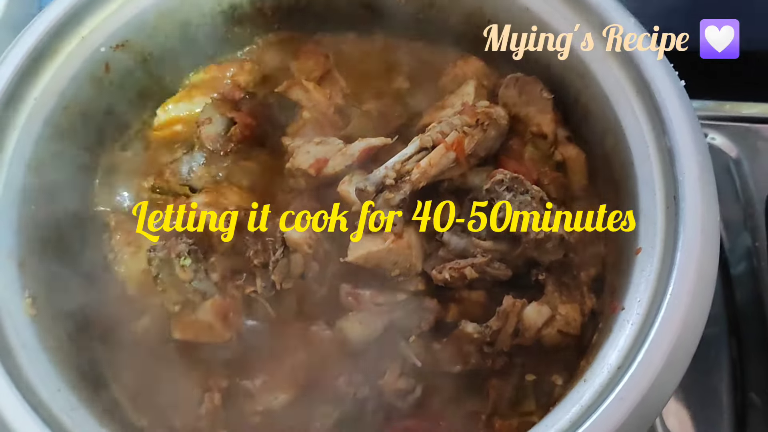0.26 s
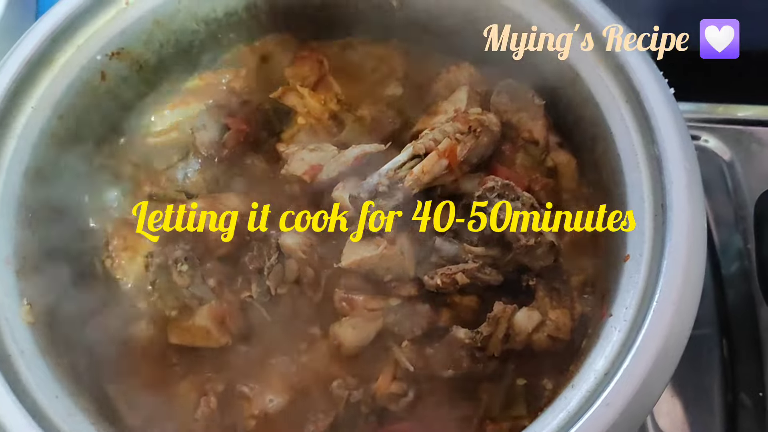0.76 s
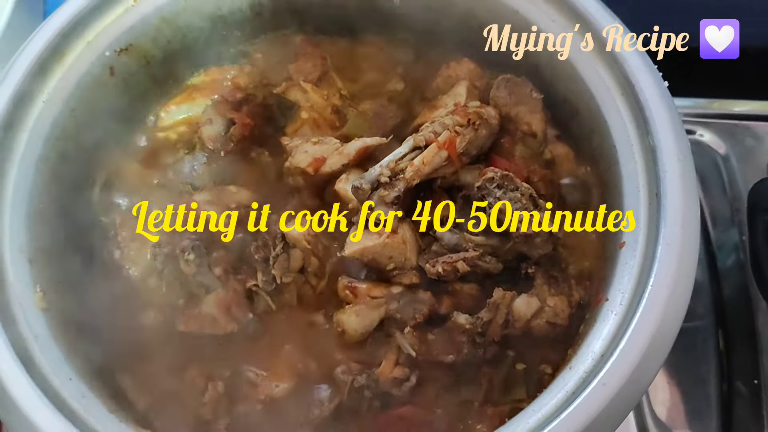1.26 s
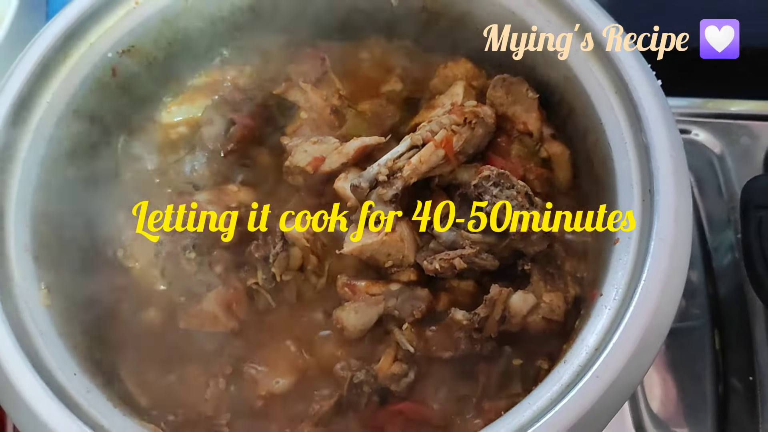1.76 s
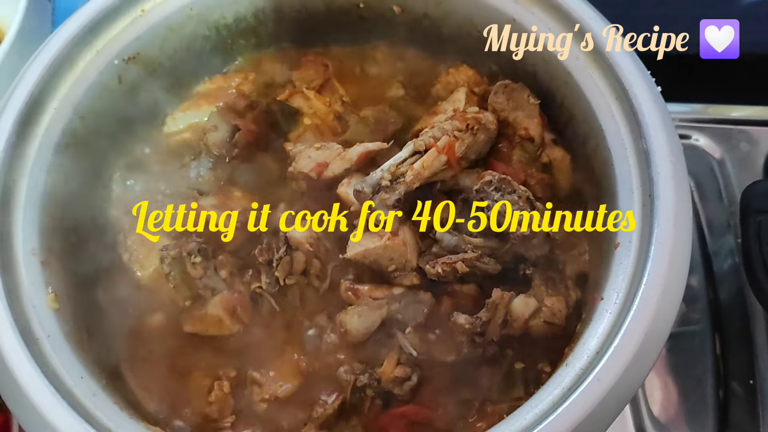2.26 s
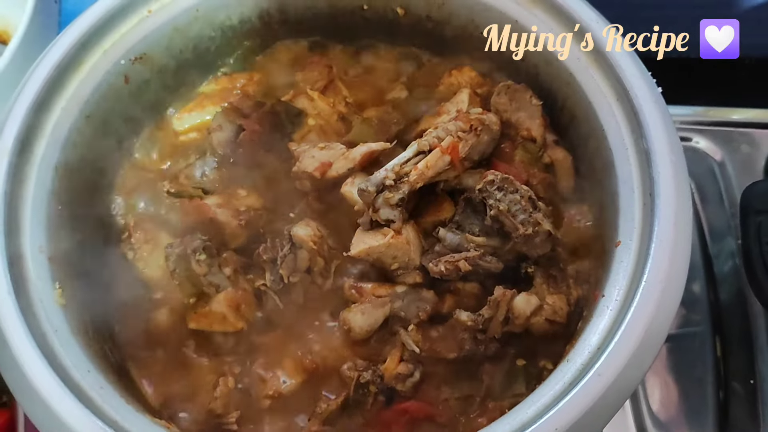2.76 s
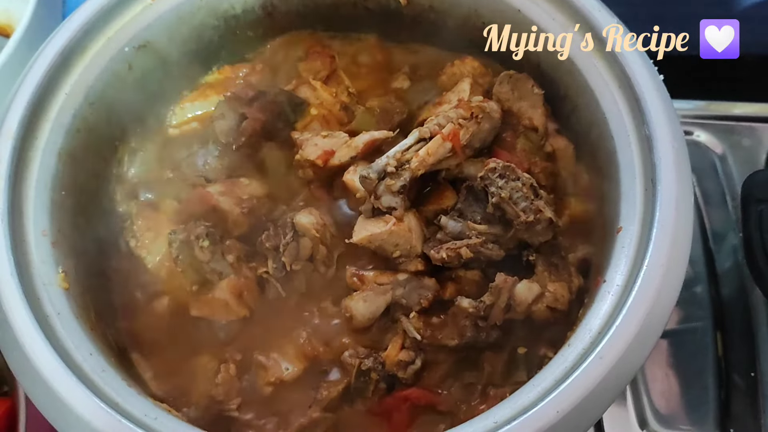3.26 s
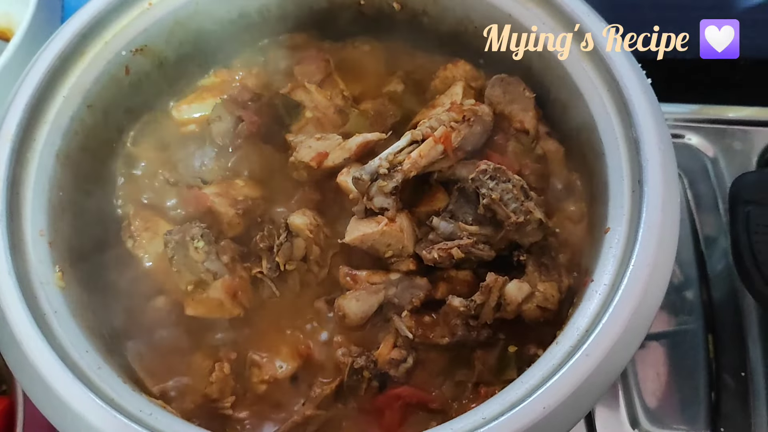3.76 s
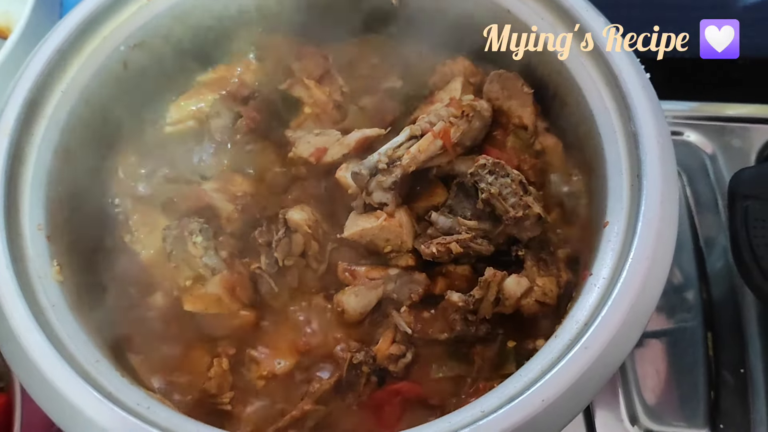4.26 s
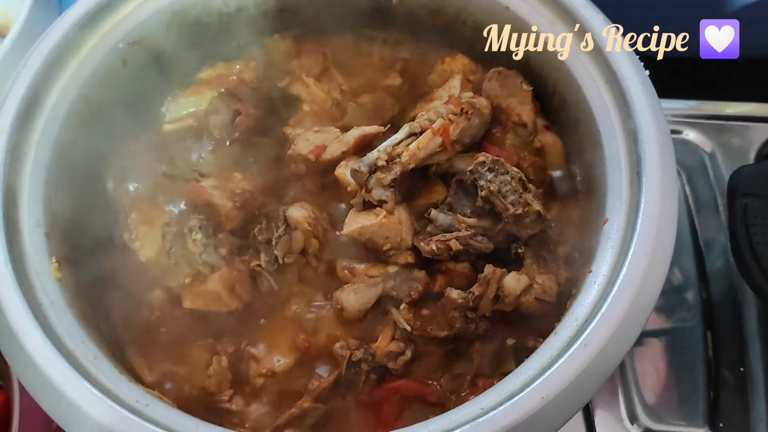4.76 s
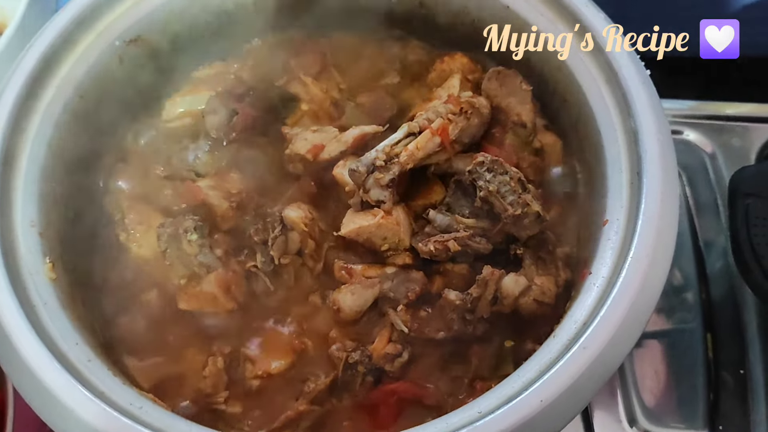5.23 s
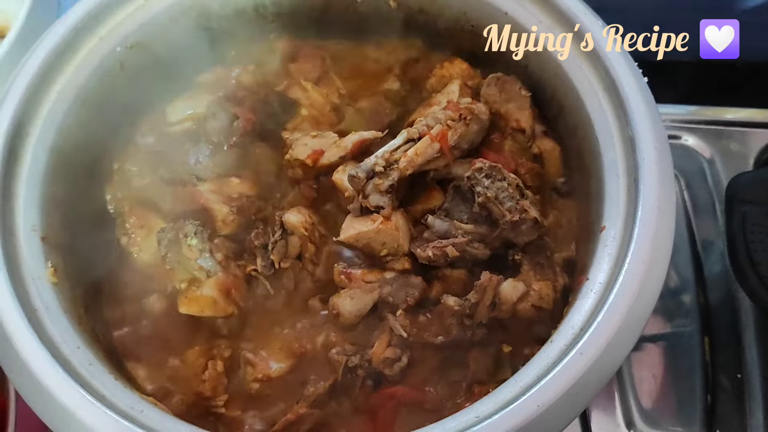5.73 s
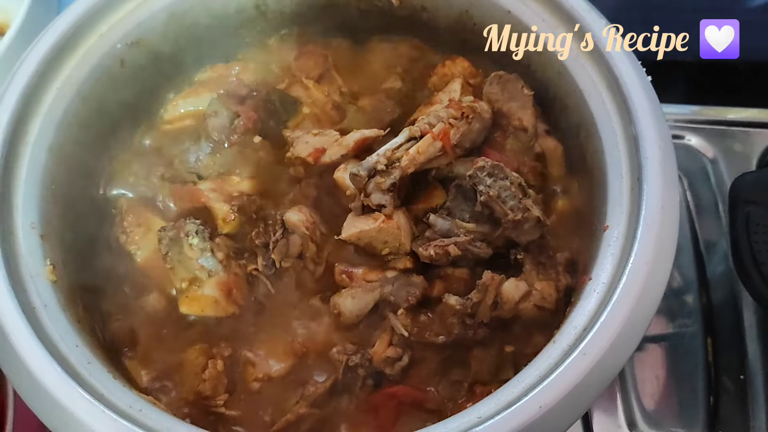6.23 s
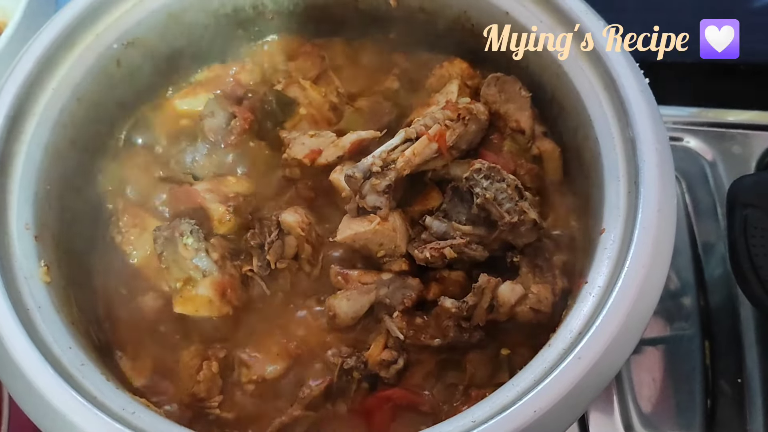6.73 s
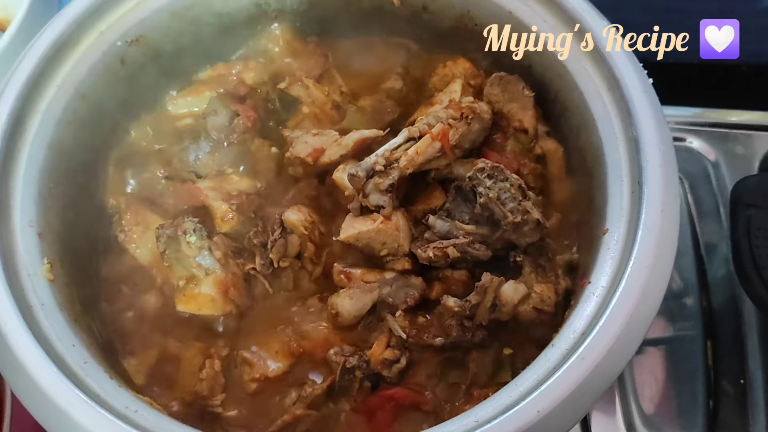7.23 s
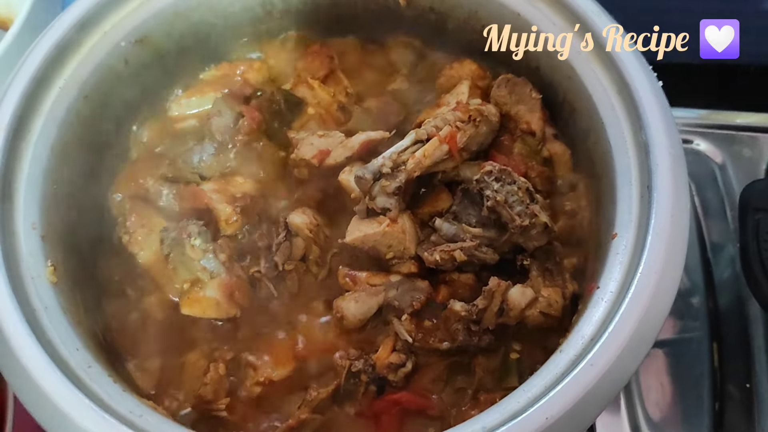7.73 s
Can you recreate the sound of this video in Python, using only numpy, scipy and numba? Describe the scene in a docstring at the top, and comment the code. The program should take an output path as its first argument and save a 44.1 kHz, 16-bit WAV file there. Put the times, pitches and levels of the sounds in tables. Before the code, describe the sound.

Thick sauce boils hard in a metal pot, dull plopping bubbles and thin ticks over soft burner roar, hiss and low steam thumps.

```python
"""Thick sauce boils hard in a metal pot; a phone with two microphone ports is held in the steam above it.
From the start the burner roars softly and gas and steam hiss (shaped noise), puffs of steam thump on the ports
(slow pressure swings), and bubbles burst with dull pops and thin ticks (short decaying rings), echoed by pot and stove.
A bright rush of steam swells from 1.9 to 3.4 s; fat spits (fading noise) near 2.8, 3.8 and 5.1 s.
From 5.62 s to the end an earlier stretch, taken from 2.98 s on, is laid on top."""
import sys
import numpy as np
from scipy import signal
from scipy.fft import rfft, irfft
from scipy.io import wavfile
from scipy.ndimage import uniform_filter1d
from numba import njit

SR = 44100
rng = np.random.default_rng(int(sys.argv[2]) if len(sys.argv) > 2 else 0)


def volts_from_db(level):
    """Convert decibel levels to linear amplitude ratios."""
    exponent = np.asarray(level, float) / 20
    return 10 ** exponent


def unload_audio(sound):
    """Save the sound as a 16-bit wav file, at the path given as the first command line argument."""
    columns = np.transpose(np.atleast_2d(sound))
    # keep every value between -1 and 1, then stretch to whole-number steps
    steps = np.round(np.clip(columns, -1, 1) * 32767)
    wavfile.write(sys.argv[1], SR, steps.astype(np.int16))


N = 352359
T = np.arange(N) / SR


def colour(x, table, db):
    """Shapes the spectrum of noise by a table of (pitch_hz, relative level_db) and sets its rms level."""
    hz, gain_db = np.transpose(table)
    f = np.arange(N // 2 + 1) * SR / N + 1  # 1 Hz up, to keep the logarithm finite
    gain = volts_from_db(np.interp(np.log(f), np.log(hz), gain_db, left=-60, right=-60))
    y = irfft(rfft(x) * gain, N)
    return y * volts_from_db(db) / np.sqrt(np.mean(y ** 2))


def walk(rate):
    """Random levels held 1 / rate s and slewed twice; spread near 1."""
    k = int(SR / rate)
    held = np.repeat(rng.standard_normal(N // k + 1), k)
    return 1.88 * uniform_filter1d(uniform_filter1d(held, k), k)[:N]


def stereo_noise(table, db, side_db):
    """Noise with a shared part and a part of opposite sign in the two ports."""
    mid, side = (colour(rng.standard_normal(N), table, db) for _ in range(2))
    return mid + volts_from_db(side_db) * side * np.array([[1], [-1]])


def burner_roar(bunch):
    """Low flame noise whose level wavers and rises and falls with the bunches of bursts."""
    # spectrum of the burner: pitch_hz, relative level_db
    roar_colour = [(55, 3.5), (100, -4), (160, 0.5), (240, -10.5), (290, 0.5), (400, -10.5), (690, -7),
                   (1400, -12.5), (4000, -32), (7000, -52)]
    waver_db = 0.17 * walk(9.8) + 4.83 * np.tanh(bunch)
    return volts_from_db(waver_db) * stereo_noise(roar_colour, -42.0, -21.0)


def gas_hiss(bunch):
    """Lasting treble noise of gas and steam that flickers in level."""
    # spectrum of the hiss: pitch_hz, relative level_db
    hiss_colour = [(1500, -73), (3000, -24), (5000, -2), (6800, 7), (9000, 1.5), (12500, -0.5),
                   (15500, -8.5)]
    flicker_db = 1.86 * walk(60) + 0.6 * bunch
    return volts_from_db(flicker_db) * stereo_noise(hiss_colour, -61.5, 0)


def steam_rush():
    """One bright rush of steam: treble noise that swells and sinks."""
    # course of the rush: time_s, level_db
    surge = [(1.9, -72), (2.3, -55.5), (2.6, -53.5), (3.08, -54), (3.13, -56), (3.4, -70.5)]
    rush = stereo_noise([(3000, 1.5), (8000, -0.5), (12500, -3.5), (15500, -10)], 0, -4.5)
    return volts_from_db(np.interp(T, *np.transpose(surge))) * rush


def steam(port):
    """Each puff sucks at the membrane, which swings back and dips once more; a slow draught wanders around."""
    # puffs on the ports: time_s (deepest suction), port, level_db (suction before the high-pass), pitch_hz
    puffs = [(0.018, "right", -2.5, 19), (0.08, "left", -3, 25), (0.105, "right", -1.5, 20.6),
             (0.196, "left", -8, 19), (0.944, "right", -8.5, 20), (1.095, "right", 3.5, 17.2),
             (1.114, "left", -2.5, 13), (1.255, "left", -9, 15), (1.732, "right", -16, 17),
             (2.567, "right", -5.5, 14), (4.277, "right", -6.5, 26), (4.304, "right", -4.5, 23),
             (4.308, "left", -17, 54), (4.333, "left", -5.5, 10), (4.99, "right", -8, 21.6),
             (5.106, "left", -10.5, 18.4), (5.345, "left", -8, 24), (5.352, "right", -12, 23),
             (5.696, "right", -2, 20), (5.718, "left", -5, 12.5), (6.045, "right", -3, 25),
             (6.109, "left", -12.5, 20), (6.38, "right", -9, 25), (6.411, "left", -5, 25),
             (7.104, "right", -7, 20), (7.346, "right", 1.5, 12.3), (7.382, "left", -4, 7.9)]
    suck_turns, swing_turns = 0.16, 0.23  # widths, in turns of the thump's pitch
    swing_back, settle = 0.59, 0.13  # rebound and last dip, relative to the suction
    stir_late_s, stir_s, stir_db = 0.034, 0.12, -21  # turbulence that trails each puff
    swing, stir = np.zeros(N), np.zeros(N)
    for s, side, db, hz in puffs:
        if side != port:
            continue
        turns = (T - s) * hz
        suction = np.exp(-(turns / suck_turns) ** 2)
        rebound = swing_back * np.exp(-((turns - .5) / swing_turns) ** 2)
        last_dip = settle * np.exp(-((turns - 1) / swing_turns) ** 2)
        swing += volts_from_db(db) * (rebound - suction - last_dip)
        stir += volts_from_db(db + stir_db) * np.exp(-((T - s - stir_late_s) / stir_s) ** 2)
    thumps = signal.sosfilt(signal.butter(2, 6., "high", fs=SR, output="sos"), swing)
    draught_colour = [(3, 21.5), (10, 28.0), (18, 21.0), (35, 10.5), (70, -3.5), (140, -39)]
    draught = colour(rng.standard_normal(N), draught_colour, 0)
    return thumps + draught * (stir + volts_from_db(-33.0 + 1.1 * walk(4.945)))


def kitchen(x, t60, db, side_db):
    """Short dull echoes off the pot and the stove, a little different in the two ports."""
    t = T[:SR // 4]
    fade = np.exp(-np.log(1000) * t / t60) * (t > .0015)
    mid, side = rng.standard_normal((2, len(t))) * fade
    tail = (mid + volts_from_db(side_db) * side * np.array([[1], [-1]])) / np.sqrt(np.sum(mid ** 2))
    dull = signal.sosfilt(signal.butter(1, 3000., fs=SR, output="sos"), tail)
    return x + volts_from_db(db) * signal.fftconvolve(x, dull, axes=1)[:, :N]


def spits():
    """Fat spits: a sharp spray of noise that starts at once, flutters and fades."""
    # fat spitting: start_s, level_db (typical, at the start), t60_s
    spit_list = [(2.779, -35, 0.057), (2.795, -36, 0.038), (3.812, -48, 0.4), (5.083, -36.5, 0.17)]
    # spectrum of the spray: pitch_hz, relative level_db
    spray_colour = [(500, -10), (2500, 10), (8000, 7), (12000, 1), (15500, -20)]
    fade = np.zeros(N)
    for s, db, t60 in spit_list:
        fade += volts_from_db(db) * (T >= s) * np.exp(-np.log(1000) * np.maximum(T - s, 0) / t60)
    return fade * volts_from_db(2.7 * walk(300)) * stereo_noise(spray_colour, 0, -6.5)


@njit
def grains(at, hz, size, cycles, rise, glide, pan, n, sr):
    """Each grain is a ring that rises, climbs in pitch by glide and dies within some cycles."""
    out = np.zeros((2, n))
    for k in range(len(at)):
        start = int(at[k] * sr)
        for i in range(min(int(6 * cycles[k] * sr / hz[k]), n - start)):
            c = i * hz[k] / sr  # cycles since the start
            envelope = (1 - np.exp(-c / rise)) ** 2 * np.exp(-c / cycles[k])
            v = size[k] * envelope * np.sin(2 * np.pi * c * (1 + glide * c))
            out[0, start + i] += v * pan[k]
            out[1, start + i] += v / pan[k]
    return out


def bursts(at, hz, db, cycles, rise, glide, pan_db):
    """Bubble bursts, each with its own ring length and place; at and db give roughly the peak."""
    chance = rng.standard_normal((len(at), 2)).T
    start = np.maximum(at - 1.461 / hz, 0)  # the ring needs a moment to reach its peak
    pan = volts_from_db(0.3 + pan_db * chance[1])  # leans slightly left
    # top of the grain's envelope at the typical ring length
    crest = (1 + 2 * cycles / rise) ** (-rise / cycles) / (1 + rise / (2 * cycles)) ** 2
    return grains(start, hz, volts_from_db(db) / crest, cycles * np.exp(.25 * chance[0]), rise, glide, pan, N, SR)


def swarm(bunch, count, hz, octaves, spread_db, bunch_db, top_db):
    """Times, pitches and relative sizes of many bursts that are louder in bunches."""
    u = rng.random((count, 2)).T
    at = u[0] * N / SR
    pitch = hz * 2 ** (octaves * rng.standard_normal(count))
    size_db = -spread_db * np.log(1 - u[1]) + bunch_db * bunch[(u[0] * N).astype(int)]
    return at, pitch, np.minimum(size_db, top_db)


def ticks(bunch):
    """Small bright bursts at the surface that also knock the pot wall into ringing, over a fine fizz."""
    # bright ticks: time_s, level_db (before the high-pass), pitch_hz
    tick_list = [(0.233, -32, 4540), (0.795, -31.5, 5330), (0.826, -28, 3930), (1.124, -31, 2340),
                 (1.385, -37, 7000), (1.473, -36, 5300), (1.981, -33, 5900), (2.062, -33, 8800),
                 (2.593, -32, 5200), (2.78, -22, 8300), (2.797, -24, 4140), (3.796, -37, 6500),
                 (3.8127, -6, 2940), (4.459, -36, 7000), (4.577, -32.5, 6450), (4.593, -19, 5290),
                 (4.945, -32.5, 5700), (5.172, -35, 6400)]
    # ringing modes of the pot wall: pitch_hz, level_db (relative to the tick, before filtering), t60_s
    wall_modes = [(1730, -22, 0.026), (1870, -36, 0.048), (5660, -1.5, 0.0039)]
    at, db, hz = np.transpose(tick_list)
    bright = bursts(at, hz, db, cycles=0.75, rise=0.4, glide=0., pan_db=0.3)

    knock = np.zeros(N)
    knock[((at - 1 / hz) * SR).astype(int)] = volts_from_db(db)
    t = T[:SR // 10]
    wall = np.zeros(len(t))
    for f, g, t60 in wall_modes:
        wall += volts_from_db(g) * np.sin(2 * np.pi * f * t) * np.exp(-np.log(1000) * t / t60)
    soft = signal.butter(4, 6800., fs=SR, output="sos")  # a wet knock is dull at the top
    clank = signal.sosfilt(soft, signal.fftconvolve(knock, wall)[:N])

    at, hz, db = swarm(bunch, count=6500, hz=6500, octaves=0.52, spread_db=4.0, bunch_db=2.0, top_db=20.5)
    fizz = bursts(at, np.minimum(hz, 15000), db - 59.5, cycles=3.2, rise=0.68, glide=0., pan_db=2.5)
    thin = signal.butter(2, 1300., "high", fs=SR, output="sos")
    return signal.sosfilt(thin, bright + fizz + clank)


def pop(at, hz, db, cycles, snap_db, thud_db):
    """The skin tears with a short high snap, the cavity rings, and the sauce slumps with a low thud."""
    scatter = rng.standard_normal((len(at), 4)).T
    snap_hz = np.clip(1.74 * hz * np.exp(0.19 * scatter[0]), 1100, 2500)
    snap = bursts(at, snap_hz, db + snap_db + 2 * scatter[1], cycles=1.0, rise=0.16, glide=0., pan_db=-1.8)
    thud_hz = 280 * np.exp(0.37 * scatter[2])
    thud = bursts(at + 0.00403, thud_hz, db + thud_db + 2.84 * scatter[3],
                  cycles=1.0, rise=0.41, glide=0., pan_db=3.0)
    ring = bursts(at, hz, db, cycles, rise=0.34, glide=0.011, pan_db=0.02)
    # the air in the pot cancels one band of the snap and the ring
    return signal.lfilter(*signal.iirnotch(470., 2.2, fs=SR), snap + ring) + thud


def bubbling(bunch):
    """Loud pops over a patter of small ones; the pot's air sings along and thick sauce damps the treble."""
    # strength of the boil: time_s, level_db (base level of the small bursts, before filtering)
    boil = [(0.0, -44), (0.5, -38), (1.5, -45), (3.0, -35.5), (3.7, -41.5), (4.3, -37), (8.0, -38)]
    # loudest bubble bursts: time_s, level_db (of the ring, before filtering), pitch_hz
    pops = [(0.019, -20.0, 940), (0.111, -17.5, 1270), (0.12, -16.5, 1450), (0.27, -21.0, 940),
            (0.334, -15.0, 860), (0.367, -18.0, 880), (0.409, -23.5, 1570), (0.638, -24.5, 940),
            (0.648, -22.5, 1430), (0.787, -22.0, 790), (0.883, -20.0, 820), (0.897, -23.5, 850),
            (0.93, -22.0, 880), (0.994, -20.5, 930), (1.063, -18.0, 1160), (1.137, -23.0, 780),
            (1.996, -20.0, 920), (2.196, -23.0, 790), (2.326, -23.5, 820), (2.345, -24.5, 900),
            (2.356, -21.0, 1340), (2.443, -23.5, 1060), (2.559, -22.5, 1120), (2.708, -23.0, 750),
            (2.762, -18.5, 1100), (2.882, -22.0, 990), (2.894, -24.5, 940), (2.955, -23.0, 1600),
            (3.014, -24.5, 740), (3.072, -22.5, 1130), (3.22, -24.5, 950), (3.232, -21.5, 1130),
            (3.467, -22.5, 650), (3.551, -16.0, 950), (3.568, -22.0, 870), (3.962, -21.5, 920),
            (3.973, -17.0, 1290), (4.074, -22.5, 750), (4.183, -23.0, 800), (4.202, -22.5, 860),
            (4.236, -18.5, 1300), (4.245, -22.0, 930), (4.313, -23.0, 950), (4.381, -21.0, 810),
            (4.425, -20.5, 1220), (4.628, -22.0, 2230), (4.718, -17.5, 1210), (4.799, -20.0, 1630),
            (5.052, -24.0, 1200), (5.232, -22.5, 1060), (5.282, -23.0, 760), (5.327, -19.0, 810),
            (5.338, -23.0, 820), (5.348, -21.5, 750), (5.575, -21.5, 820), (5.675, -18.5, 830),
            (5.887, -22.0, 820), (6.137, -21.0, 1040), (6.262, -20.0, 1670), (6.413, -17.0, 960),
            (6.79, -21.5, 780), (7.378, -22.0, 820), (7.434, -19.0, 1000), (7.569, -21.0, 830),
            (7.653, -22.0, 740), (7.743, -13.5, 690)]
    # resonances of the air inside the pot: pitch_hz, sharpness_q, level_db (relative to the bursts)
    pot_air = [(689, 20, 3.5), (826, 36, -4), (1500, 15, -3)]
    at, db, hz = np.transpose(pops)
    loud_pops = pop(at, hz, db, cycles=1.35, snap_db=-3.5, thud_db=-17)
    at, hz, db = swarm(bunch, count=1500, hz=1060, octaves=0.52, spread_db=4.5, bunch_db=3.0, top_db=9.5)
    boil_db = np.interp(at, *np.transpose(boil))
    patter = pop(at, hz, db + boil_db, cycles=1.7, snap_db=-11.5, thud_db=-14.5)
    dry_bursts = loud_pops + patter
    singing = sum(volts_from_db(g) * signal.lfilter(*signal.iirpeak(f, q, fs=SR), dry_bursts) for f, q, g in pot_air)
    return signal.sosfilt(signal.butter(2, 2900., fs=SR, output="sos"), dry_bursts + singing)


def scene():
    """Burner, hiss, steam on the ports, and the pot with its echoes."""
    bunch = walk(48)  # bursts, roar and hiss surge together
    background = burner_roar(bunch) + gas_hiss(bunch) + steam_rush()
    puffs = np.array([steam("left"), steam("right")])
    pot = kitchen(spits() + ticks(bunch) + bubbling(bunch), t60=0.062, db=-13.5, side_db=-4.0)
    return background + puffs + pot


def lay_again(dry):
    """An edit lays an earlier stretch over the end, half as loud for its first moment."""
    from_s, at_s = 2.9765, 5.62
    lag = int((at_s - from_s) * SR)
    gain = np.interp(T - at_s, [0, .005, .13, .14], [0, .5, .5, 1])
    return dry + gain * np.roll(dry, lag, axis=1)


def roll_off(x):
    """The treble ends steeply here."""
    return signal.sosfilt(signal.butter(12, 15720, fs=SR, output="sos"), x)


def record(dry):
    """The earlier stretch is laid on top and peaks flatten at full scale."""
    mixed = np.clip(lay_again(dry), -1, 1)
    return roll_off(mixed)


dry = scene()
out = record(dry)
unload_audio(out)
```